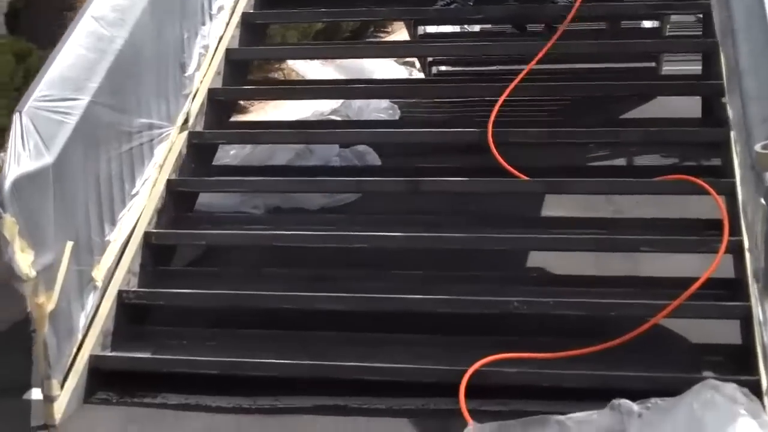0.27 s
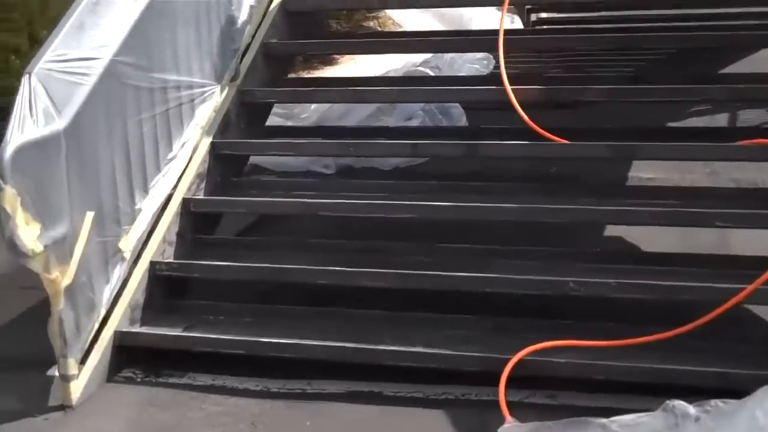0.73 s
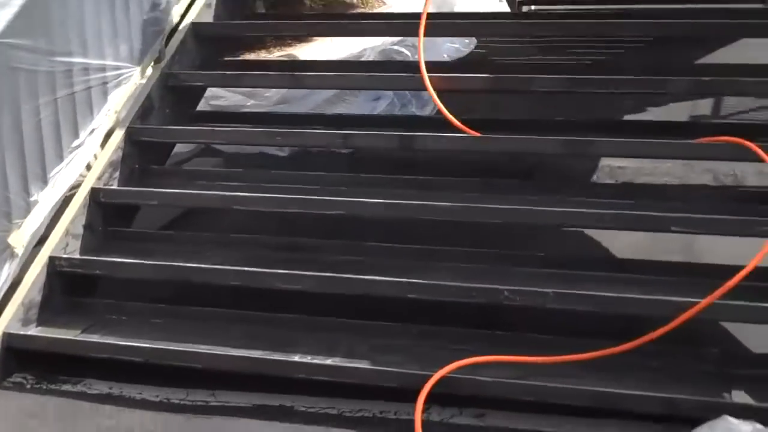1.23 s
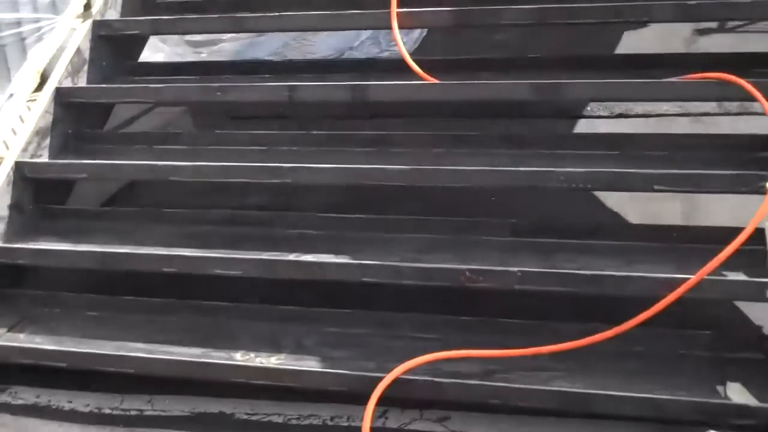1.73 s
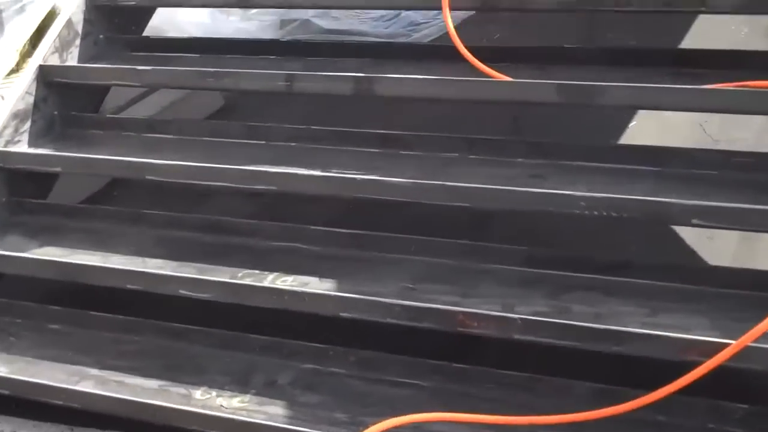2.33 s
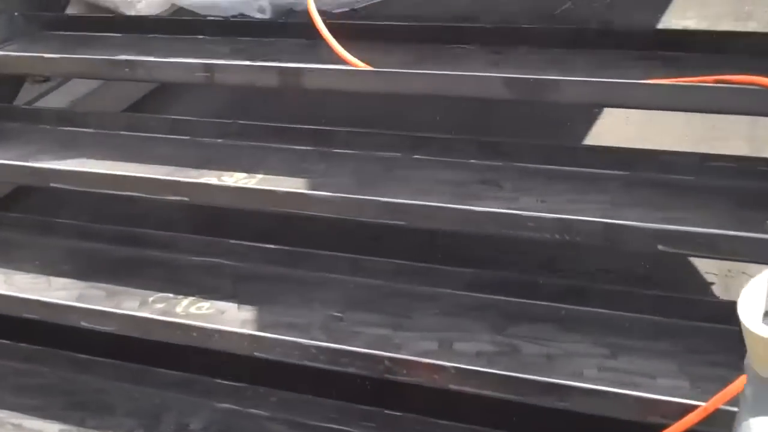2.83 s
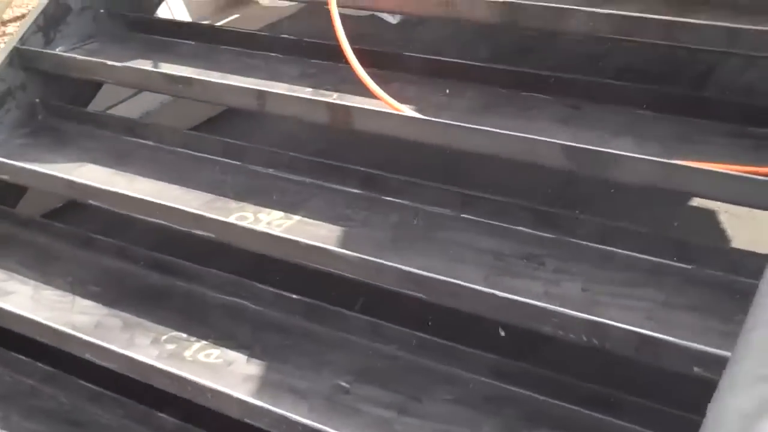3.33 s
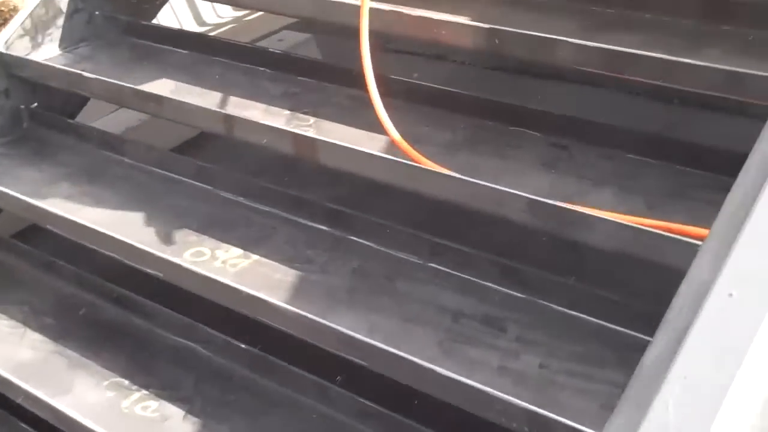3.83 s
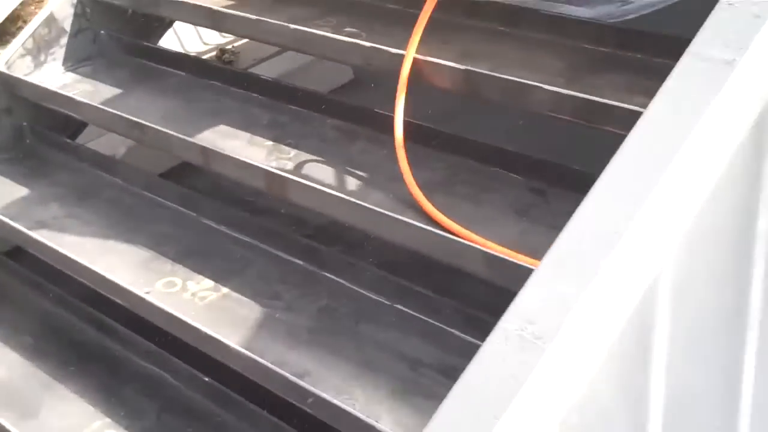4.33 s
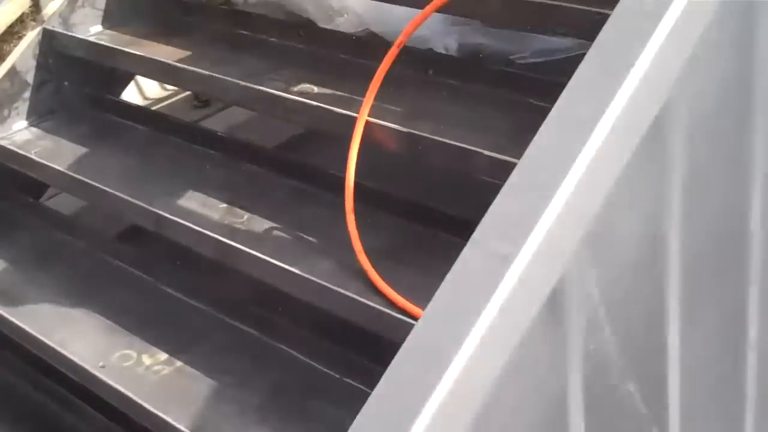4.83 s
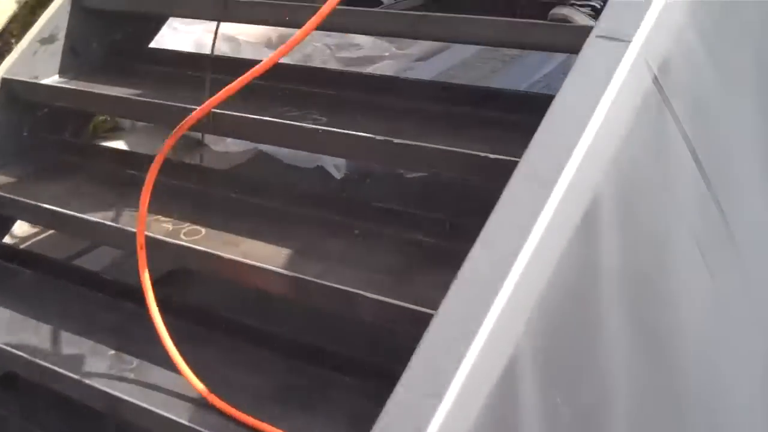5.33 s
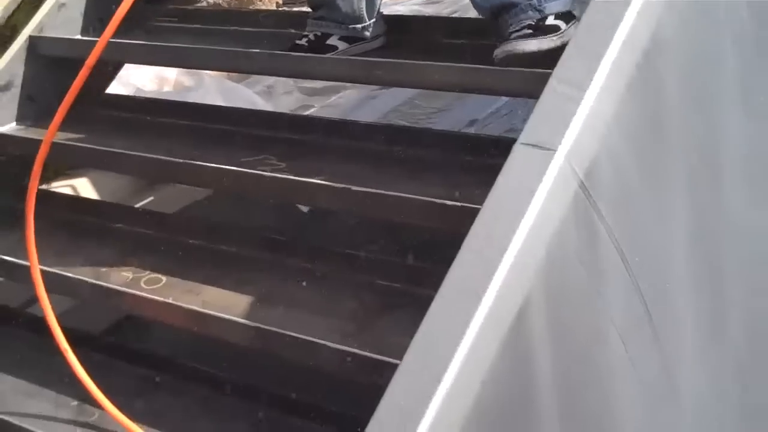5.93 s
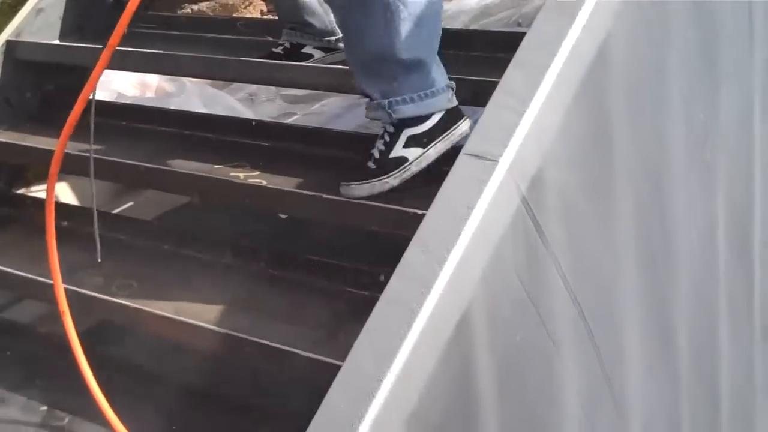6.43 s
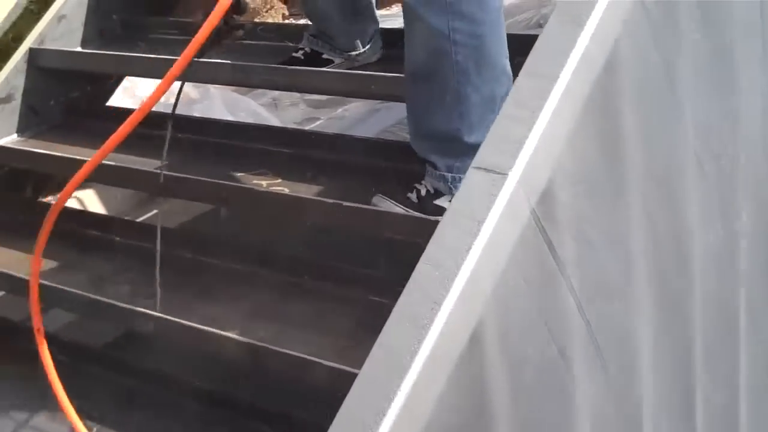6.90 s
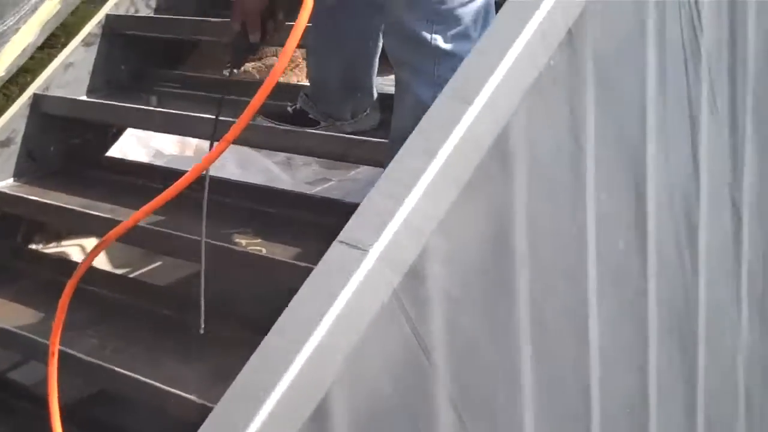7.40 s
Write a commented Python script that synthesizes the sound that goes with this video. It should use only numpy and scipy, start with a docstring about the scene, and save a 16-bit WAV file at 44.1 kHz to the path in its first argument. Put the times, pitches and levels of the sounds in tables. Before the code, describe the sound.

A steady but restless spray hiss dominates, breathy and bright, with short whooshes where the jet crosses stair edges. A low-mid motor drone sits behind it in open air. A rapid rattle of dry plastic snaps is the loudest event, followed by a damped footfall on metal. The trigger is released for about half a second, exposing a soft steel ring and engine hum, before spraying restarts strongly. Mono, carried from the foot of the stairs towards the rail.

```python
"""Airless spraying of outdoor steel stairs

A spray fan hisses at the tip and splashes on the treads, with short rushes at edges and slower swells.
Plastic sheet flutters in one short burst and a shoe lands on a tread: cracks and damped resonances.
The trigger is let go for 0.6 s; in the lull a light tap sets the steel ringing in decaying modes.
The pump engine, a set of firing-rate harmonics, hums some way off; spray and outdoor air are shaped noise."""
import sys
import numpy as np
from scipy import signal
from scipy.fft import rfft, irfft, next_fast_len
from scipy.io import wavfile
from scipy.ndimage import uniform_filter1d, map_coordinates

SR = 44100
rng = np.random.default_rng(int(sys.argv[2]) if len(sys.argv) > 2 else 0)


def bounce(signal):
    """Save signal as a 16-bit WAV file at the path given by the first command-line argument."""
    frames = np.transpose(np.atleast_2d(signal))
    limited = np.clip(frames, -1, 1)
    pcm = np.round(limited * 32767).astype(np.int16)
    wavfile.write(sys.argv[1], SR, pcm)


N = 337806
TIME = np.arange(N) / SR

# trigger held: (from [s], to [s])
TRIGGER_HELD = [(-1, 6.92), (7.521, 9)]
# fan level as the arm sweeps, before trim, per trigger pull: (time [s], tip hiss [dB], splash [dB])
FIRST_PASS = [(0.0, -39.5, -39.5), (0.7, -39, -39), (0.8, -38, -36), (1.14, -36.5, -41.5), (1.26, -42, -46),
              (1.54, -49, -46), (1.85, -43.5, -44.5), (2.1, -39.5, -40.5), (2.68, -39, -40),
              (3.16, -41.5, -43.5), (3.7, -40, -43), (4.06, -37.5, -41), (4.36, -46, -47),
              (4.82, -38.5, -44), (5.04, -41.5, -45.5), (5.28, -40.5, -39), (5.38, -37, -40),
              (5.5, -37, -40.5), (5.68, -46.5, -47.5), (5.92, -46, -53), (6.2, -48, -49.5),
              (6.36, -39.5, -42.5), (6.5, -45.5, -47.5), (6.58, -42, -47), (6.9, -44.5, -46.5)]
SECOND_PASS = [(7.54, -36, -37.5), (7.6, -36.5, -35), (7.65, -39.5, -38.5)]
# spectra before scaling to rms 1: (frequency [Hz], gain [dB])
HISS_COLOUR = [(150, -21), (400, -5.5), (1200, -6), (3000, -11), (5000, -2.5), (7000, 1), (8800, -1),
               (10000, 1), (11600, 3), (13000, 1.5), (14000, -2)]
SPLASH_COLOUR = [(100, -18), (300, -8), (600, -9), (1100, -5.5), (2000, -2.5), (2800, 2.5), (4300, 2),
                 (5500, -2), (8000, -8.5), (14000, -32)]
# swells of spray noise, short rushes at edges and slower swells of low, middle or high hiss:
# (time [s], rise [s], fall [s], level before trim [dB], centre [Hz], nominal width [Hz],
# sink of the note [share], boom re main band [dB], boom note [Hz])
SPRAY_SWELLS = [(0.1, 0.11, 0.13, -50.5, 383, 45, -0.0054, -12, 400),
                (0.80, 0.021, 0.05, -39.5, 3700, 1400, 0.11, -22, 600),
                (0.87, 0.032, 0.061, -41.5, 1900, 1700, 0.19, -19, 600),
                (1.03, 0.052, 0.043, -46, 4350, 800, .02, -28, 550),
                (1.06, 0.04, 0.033, -46, 367, 110, 0.057, -12, 550),
                (1.124, 0.013, 0.011, -32.5, 1650, 1050, 0.14, -10, 600),
                (1.17, .06, 0.065, -40, 12600, 2200, .02, -30, 550),
                (1.15, 0.029, .022, -39.5, 950, 650, .15, -7.5, 380),
                (1.65, 0.083, 0.09, -56, 1990, 250, .02, -17, 500),
                (1.65, 0.092, 0.12, -53, 3600, 1400, 0.039, -25, 500),
                (2.038, 0.0089, 0.021, -35.5, 1050, 600, 0.071, -0.5, 410),
                (2.191, 0.026, 0.028, -35.5, 1140, 1600, .05, -5, 610),
                (2.191, 0.032, 0.026, -39.5, 3730, 1300, 0.094, -24, 600),
                (2.38, .12, .11, -43, 12500, 1700, -.04, -30, 520),
                (2.9, 0.1, .22, -46, 13800, 1000, -0.013, -30, 520),
                (2.42, 0.12, 0.079, -49, 4030, 900, -0.053, -6, 520),
                (2.65, 0.062, .11, -41.5, 3100, 1500, 0.14, -9, 650),
                (2.8, 0.25, 0.27, -49, 1510, 600, 0.073, -4, 610),
                (3.28, 0.098, 0.042, -51, 1810, 596, 0.072, 0.5, 554),
                (3.491, 0.029, 0.038, -48, 430, 260, 0.12, -2, 395),
                (3.7, .14, 0.16, -48, 1440, 1000, 0.076, 0, 503),
                (3.699, 0.19, .2, -53, 1900, 200, 0.038, -17, 520),
                (3.8, 0.25, .15, -50, 4200, 600, 0.011, -25, 520),
                (3.83, 0.042, 0.041, -51, 465, 200, 0.046, -10, 330),
                (4.0, 0.065, 0.056, -49.5, 427, 260, 0.11, -3, 330),
                (4.55, .2, 0.21, -48.5, 4620, 1199, 0.022, -18, 418.5),
                (4.89, 0.07, .2, -46, 5500, 2400, 0.038, -9, 484),
                (5.83, 0.13, .12, -55.5, 1650, 700, 0.019, -5, 480),
                (6.4, 0.19, 0.32, -54, 6150, 600, .03, -25, 480),
                (6.235, 0.043, 0.073, -37.5, 1590, 520, 0.074, -8, 610),
                (6.39, 0.06, 0.052, -38, 1520, 320, 0.033, -10, 400),
                (6.458, .016, 0.013, -36, 1440, 450, .04, -18, 350),
                (6.6, 0.023, 0.043, -40, 1410, 560, 0.084, -18, 420),
                (6.6, 0.025, 0.036, -43.5, 3140, 1310, 0.018, -26, 420),
                (6.79, 0.027, 0.045, -47.5, 1400, 900, 0.088, -24, 420),
                (6.79, 0.026, 0.041, -47, 3000, 700, .03, -27, 420),
                (7.58, .05, .05, -41.5, 5700, 450, .01, -30, 420),
                (7.54, 0.017, 0.025, -33, 1220, 500, 0.056, -11, 420),
                (7.597, 0.028, 0.034, -28, 1300, 450, 0.064, -16.5, 424)]
# reflection off the tread, sooner as the gun is held lower: (time [s], lag [ms])
TREAD_BOUNCE = [(0, 1.73), (.85, 1.72), (1.4, 1.52), (1.9, 1.76), (2.8, 1.66), (4.2, 1.35), (5.3, 1.2),
                (6.2, .53), (6.9, .6), (7.55, .78)]
# hardest and lone snaps of the sheet: (time [s], peak of the swing [dB], pitch [Hz])
SHEET_SNAPS = [(5.333, -29, 430), (5.354, -28, 750), (5.366, -18, 556), (5.371, -22, 350),
               (5.381, -22, 420), (5.3895, -13.5, 435), (5.399, -19, 340), (5.410, -14, 560),
               (5.423, -18, 550), (5.433, -24, 1490), (5.4365, -11.5, 450), (5.447, -18, 700),
               (5.457, -17, 750), (5.460, -15, 600), (5.467, -16, 900), (5.474, -15, 750),
               (5.482, -16, 900), (5.491, -15.5, 380), (5.4955, -13.5, 700), (5.499, -21, 800),
               (5.507, -20, 550), (5.516, -18, 350), (5.5245, -22, 556), (5.531, -25, 408),
               (5.544, -26, 460), (5.563, -32, 383), (5.591, -30.5, 398), (5.596, -37, 443),
               (5.601, -27, 503)]
# shoe on the treads: (time [s], peak of the swing [dB], pitch [Hz])
SHOE_STEPS = [(5.84, -35.5, 400), (6.298, -30, 330), (6.321, -34, 300), (6.330, -33, 300),
              (6.363, -29, 400), (6.371, -21, 750), (6.376, -22.5, 350), (6.472, -39, 300),
              (6.585, -41, 250)]
# light tap on the steel: (time [s], level before ring and crash gains [dB])
STEEL_TAP = [(6.969, -52)]
# modes of the steel: (frequency [Hz], relative level [dB], t60 [s])
STEEL_MODES = [(894, -7, 5.0), (958, -15, 5.0), (1012, 0, 2.4), (1120, -1, 1.4), (1249, -1, 2.1),
               (1297, -3, 0.76), (1405, -6, 1.4), (1497, -12, 1.6), (1583, -4, 1.7), (1653, -2, 0.36),
               (1776, -11, 0.75), (1992, -10, 0.58), (2218, -20, 1.0), (2789, -16, 0.49)]
# pump engine, before the rail trim: (time [s], level [dB])
ENGINE_LEVEL = [(0, -45.5), (.9, -47), (1.5, -52.5), (2.4, -46.5), (3.0, -55), (5.2, -54.5), (6, -59),
                (6.9, -58), (7.65, -49)]
# engine: (multiple of firing rate [1], relative level at the foot [dB], relative level by the rail [dB])
ENGINE_HARMONICS = [(6, -16, -11), (10, -21, -13), (12, -14, -16), (14, -17, -17), (16, -16, -13),
                    (17, -10, -8), (18, -9, -16), (19, -4, -3), (20, -9, -13), (21, -5, -9), (22, -4, 0),
                    (23, -13, -4), (24, -1, -16), (25, 0, -17), (26, -11, -8), (27, -8, -3), (28, 0, -1),
                    (29, -13, -6), (30, -4, -16), (31, -15, -12), (32, -10, -10), (33, -19, -11),
                    (34, -13, -8), (35, -15, -11), (36, -7, -18), (39, -9, -15), (42, -13, -18),
                    (43, -12, -12), (46, -11, -14), (47, -13, -17), (53, -15, -22)]
# outdoor air before scaling to rms 1: (frequency [Hz], gain [dB])
AIR_COLOUR = [(25, -31), (50, -12), (90, -5), (120, 2), (155, -2), (200, 0.5), (500, 1.5), (900, -4.5),
              (1400, -11), (2000, -19), (2500, -22), (4000, -27), (6000, -25.5), (8500, -23), (11000, -28),
              (14000, -31)]


def undb(db):
    """Decibels to gain."""
    return 10 ** (np.asarray(db) / 20)


def unit(x):
    """Scale to rms 1."""
    return x / np.sqrt(np.mean(x ** 2))


def curves(rows):
    """Each column of a time table, joined by straight lines."""
    s, *columns = np.transpose(rows)
    return [np.interp(TIME, s, c) for c in columns]


def walk(rate_hz):
    """Smooth random wander, spread near 1, from rate_hz random values a second."""
    k = int(SR / rate_hz)
    steps = np.repeat(rng.standard_normal(N // k + 1), k)
    smooth = uniform_filter1d(uniform_filter1d(steps, k), k)
    return 1.61 * smooth[:N]


def noise(colour):
    """Noise of rms 1 with a (Hz, dB) colour."""
    size = next_fast_len(N, real=True)
    hz, db = np.transpose(colour)
    bin_hz = np.fft.rfftfreq(size, 1 / SR)
    gain = undb(np.interp(np.log(bin_hz + 1), np.log(hz), db))
    spectrum = rfft(rng.standard_normal(size)) * gain
    return unit(irfft(spectrum, size)[:N])


def resonate(x, hz, width_hz):
    """Two-pole resonance, gain 1 at the centre."""
    return signal.lfilter(*signal.iirpeak(hz, hz / width_hz, fs=SR), x)


def delayed(x, ms):
    """The sound a fixed or moving number of milliseconds later."""
    return np.interp(TIME - ms / 1000, TIME, x, left=0)


def spray(hiss_trim_db=2.5, splash_trim_db=-1.0, sputter_db=0.65, spatter_db=1.0):
    """Tip hiss, splash and swells, gated by the trigger and combed by reflections off the stairs."""
    hiss_db, splash_db = curves(np.vstack([FIRST_PASS, SECOND_PASS]))
    hiss_db = hiss_db + hiss_trim_db + sputter_db * walk(180) + 0.78 * walk(24.9)
    splash_db = splash_db + splash_trim_db + spatter_db * walk(260)
    hiss = noise(HISS_COLOUR) * undb(hiss_db)
    splash = noise(SPLASH_COLOUR) * undb(splash_db)
    jet = trigger(open_s=0.017, close_s=0.02) * (drift(hiss + splash) + swells())
    return jet + reflections(jet)


def trigger(open_s, close_s):
    """Valve gain: smooth opening over tens of milliseconds, slightly slower closing."""
    held = 0
    for on, off in TRIGGER_HELD:
        opening = 1 + np.tanh((TIME - on) / open_s)
        closing = 1 - np.tanh((TIME - off) / close_s)
        held = held + opening * closing / 4
    return held


def reflections(jet, tread_share=0.24, wall_share=0.091, sway_ms=0.145):
    """The wet tread returns a band round 6 kHz; risers and side walls add faint swaying echoes."""
    lag_ms, = curves(TREAD_BOUNCE)
    tread = tread_share * delayed(resonate(jet, 6000, 2700), lag_ms)
    # lags sway with the arm
    walls = sum(delayed(jet, ms + sway_ms * walk(1.5)) for ms in (0.7, 2.3, 3.4, 5.1))
    return tread + wall_share * walls


def drift(x, depth=0.16):
    """As the fan sweeps over the tread, narrow bands of its sound swell and sink independently."""
    centres_hz = np.geomspace(1300, 9000, num=11)
    bands = sum(walk(5) * resonate(x, hz, hz / 7) for hz in centres_hz)
    return x + depth * bands


def swells(trim_db=-0.6, flutter_db=1.3, boom_width_hz=220, boom_stretch=1.392):
    """Short rushes at edges and slower swells of hiss, each with a boom that fades more slowly."""
    out = np.zeros(N)
    for s, rise_s, fall_s, db, hz, width_hz, sink, boom_db, boom_hz in SPRAY_SWELLS:
        main = swell(s, rise_s, fall_s, hz, width_hz, sink)
        boom = swell(s, rise_s, boom_stretch * fall_s, boom_hz, boom_width_hz, sink)
        out += undb(db) * (main + undb(boom_db) * boom)
    return out * undb(flutter_db * walk(220) + trim_db)


def swell(s, rise_s, fall_s, hz, nominal_width_hz, sink, skirt=0.046):
    """Resonant noise that rises and falls in level while its note glides, down for positive sink."""
    out = np.zeros(N)
    along = (TIME - s) / np.where(TIME < s, rise_s, fall_s)
    near = np.flatnonzero(np.abs(along) < 4)
    source = rng.standard_normal(N)[:2 * len(near) + 2]
    once = resonate(source, hz, 1.64 * nominal_width_hz)
    body = unit(resonate(once, hz, 1.86 * nominal_width_hz) + skirt * once)
    # reading speed sets the pitch
    glide = np.cumsum(1 - sink * np.tanh(along[near]))
    envelope = np.exp(-along[near] ** 2 / 2)
    out[near] = envelope * map_coordinates(body, [glide])
    return out


def sheet():
    """Plastic sheet flaps in a quick run of dry snaps, each little more than one swing."""
    return blows(np.vstack([SHEET_SNAPS, flutter()]), width=0.5, dull_hz=1900,
                 rattle=0.07, rattle_s=0.002, thud_hz=239, thud_db=-8.0, thud_s=0.0054,
                 crack_hz=1800, crack_db=-14, lowest_hz=88)


def flutter(start_s=5.36, end_s=5.505, attack_s=0.1, release_s=0.012,
            count=34, scatter_db=2, scatter_pitch=0.27):
    """Small snaps (s, dB, Hz): louder and higher as the sheet tightens, falling as it slackens."""
    slack_db, taut_db, slack_hz, taut_hz = -28, -20.5, 350, 800
    s = start_s + (end_s - start_s) * (np.arange(count) + rng.random(count)) / count
    taut = np.interp(s, [start_s, start_s + attack_s, end_s - release_s, end_s], [0, 1, 1, 0])
    hz = np.interp(s, [start_s, end_s - release_s, end_s], [slack_hz, taut_hz, slack_hz])
    loud, high = rng.standard_normal((count, 2)).T
    db = slack_db + (taut_db - slack_db) * taut + scatter_db * loud
    return np.column_stack([s, db, hz * np.exp(scatter_pitch * high)])


def shoe():
    """A rubber sole lands on a tread, which booms briefly."""
    return blows(SHOE_STEPS, width=1.36, dull_hz=2200, rattle=0.16, rattle_s=0.0045,
                 thud_hz=105, thud_db=-7, thud_s=0.0043, crack_hz=1100, crack_db=-15, lowest_hz=55)


def blows(rows, width, dull_hz, rattle, rattle_s, thud_hz, thud_db, thud_s, crack_hz, crack_db, lowest_hz):
    """An impulse and brief rattle drive a heavily damped resonance and a crack, over a low thud."""
    out, t = np.zeros(N), np.arange(4096) / SR
    soften = signal.butter(2, dull_hz, fs=SR, output="sos")
    for s, db, hz in rows:
        push = (t == 0) + rattle * rng.standard_normal(len(t)) * np.exp(-t / rattle_s)
        # width is a share of the pitch
        swing = signal.sosfilt(soften, resonate(push, hz, width * hz))
        bright_hz = crack_hz * rng.uniform(0.7, 1.3)
        crack = signal.sosfilt(soften, resonate(push, bright_hz, bright_hz / 2))
        low_hz = thud_hz * rng.uniform(0.75, 1.35)
        thud = np.sin(2 * np.pi * low_hz * t) * np.exp(-t / thud_s)
        blow = swing / np.abs(swing).max()
        blow = blow + undb(crack_db) * crack / np.abs(crack).max()
        blow = blow + undb(thud_db) * thud
        start = int(s * SR)
        out[start:start + len(t)] += rng.choice([-1, 1]) * undb(db) * blow
    return signal.sosfilt(signal.butter(2, lowest_hz, "high", fs=SR, output="sos"), out)


def steel(ring_db=-6, crash_db=-2, crash_s=0.029, crash_hz=1200, crash_width_hz=1800):
    """A tap excites a dense crash that is soon gone and a few plate modes that ring on."""
    out = np.zeros(N)
    for s, db in STEEL_TAP:
        t = np.maximum(TIME - s, 0)
        ring = 0
        for hz, mode_db, t60_s in STEEL_MODES:
            decay = np.exp(-np.log(1000) * t / t60_s)
            phase = rng.uniform(0, 2 * np.pi)
            ring = ring + undb(mode_db) * np.sin(2 * np.pi * hz * t + phase) * decay
        once = resonate(rng.standard_normal(N), crash_hz, crash_width_hz)
        crash = unit(resonate(once, crash_hz, crash_width_hz)) * np.exp(-t / crash_s)
        out += undb(db) * (t > 0) * (undb(ring_db) * ring + undb(crash_db) * crash)
    return out


def engine(firing_hz=20.97, sag_hz_per_s=0.0146, gas_hz=520, gas_width_hz=330, gas_db=-22, rail_db=-1):
    """One cylinder's harmonics, upper exhaust note trailing the lower in each chug, plus gas noise."""
    stagger_rad, throb, waver_db = 1.05, 0.15, 1.1
    # firing sags slowly under load
    rate_hz = firing_hz - sag_hz_per_s * TIME
    angle = 2 * np.pi * np.cumsum(rate_hz) / SR
    db, = curves(ENGINE_LEVEL)
    # microphone carried from the foot of the stairs (0) to the rail (1)
    place = np.interp(TIME, [0.79, 6.7], [0, 1])
    # at the foot echoes blur the chugs into a drone: phase scatter
    blur_rad = np.interp(place, [0.5, 1], [1.15, 0.15])
    hum, power = 0, 0
    for k, at_foot_db, at_rail_db in ENGINE_HARMONICS:
        gain = undb(at_foot_db + place * (at_rail_db - at_foot_db))
        lag = stagger_rad * np.hypot(k - gas_hz / firing_hz, 1) + blur_rad * rng.standard_normal()
        hum = hum + gain * undb(waver_db * walk(2.0)) * np.sin(k * angle - lag)
        power = power + gain ** 2 / 2
    once = resonate(rng.standard_normal(N), gas_hz, gas_width_hz)
    gas = unit(resonate(once, gas_hz, gas_width_hz))
    level = undb(db + rail_db * place)
    puffs = 1 + throb * place * np.cos(angle)
    return level * puffs * (hum / np.sqrt(power) + undb(gas_db) * gas)


def outdoor_air(level_db=-58, waver_db=0.5):
    """Steady coloured noise with a slight slow waver."""
    return noise(AIR_COLOUR) * undb(level_db + waver_db * walk(2.98))


def scene():
    """All sources reach one microphone and sit in the centre."""
    mono = spray() + sheet() + shoe() + steel() + engine() + outdoor_air()
    return np.array([mono, mono])


def record(dry, top_hz=13900):
    """The recorder cuts the top steeply."""
    steep = signal.ellip(12, 0.1, 80, top_hz, fs=SR, output="sos")
    return signal.sosfilt(steep, dry)


dry = scene()
out = record(dry)
bounce(out)
```